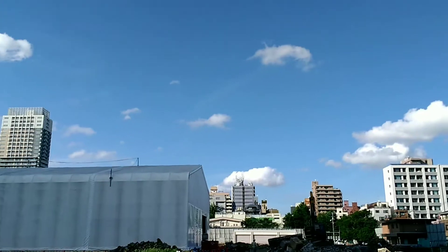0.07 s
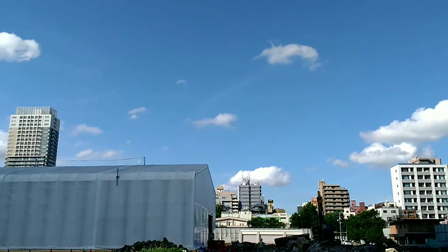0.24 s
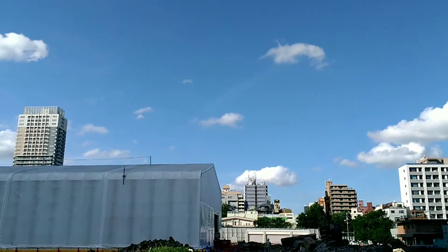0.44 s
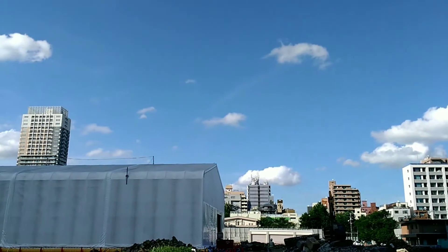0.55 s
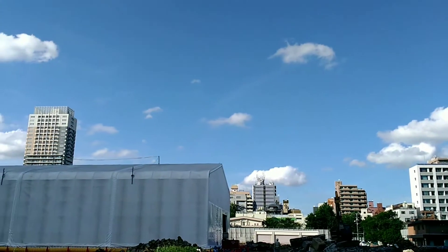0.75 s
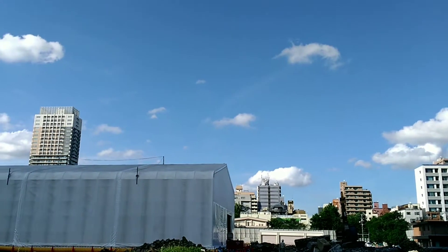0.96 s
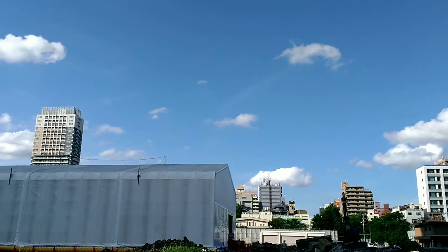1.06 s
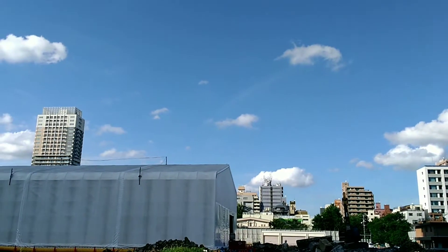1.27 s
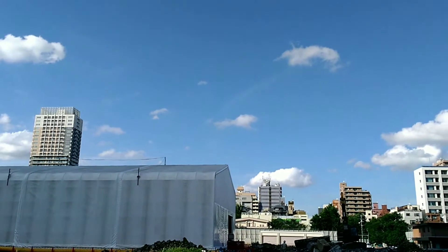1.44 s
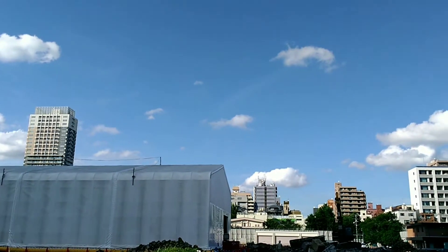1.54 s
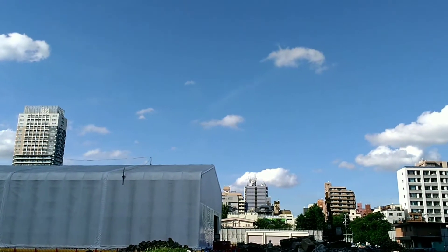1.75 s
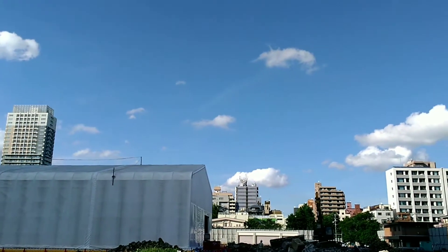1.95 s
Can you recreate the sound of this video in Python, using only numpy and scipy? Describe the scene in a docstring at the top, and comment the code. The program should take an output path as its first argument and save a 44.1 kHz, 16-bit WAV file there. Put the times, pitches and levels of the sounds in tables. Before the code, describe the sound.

Rubble crashes onto steel, slightly to the right, over a diesel engine and traffic roar. The ringing impacts echo between city buildings, then everything turns quieter and duller as pieces settle with light knocks.

```python
"""A city building site. From 0.2 s a diesel engine drones under traffic roar and a far machine's whine.
At 0.5 s rubble crashes on steel, off to the right: clustered impacts crack, set the steel ringing
and reverberate between the buildings. From 0.8 s the whole sound drops back and dulls.
Settling pieces then knock and clack under a faint chatter with blurred chirps."""
import sys
import numpy as np
from scipy import signal
from scipy.io import wavfile

SR = 44100
rng = np.random.default_rng(int(sys.argv[2]) if len(sys.argv) > 2 else 0)


def transcribe(signal):
    """Save signal, clipped to [-1, 1], as a 16-bit WAV file at the path in sys.argv[1]."""
    frames = np.atleast_2d(signal).T
    limited = np.clip(frames, -1, 1)
    pcm = np.round(limited * 32767).astype(np.int16)
    wavfile.write(sys.argv[1], SR, pcm)


N = 88200
T = np.arange(N) / SR

# Left-right likeness. Each row: frequency in Hz, correlation (clipped to 0-1 in use).
LIKENESS = [(300, 1), (600, 1.35), (1000, 0.77), (2000, 0), (5000, 0.12), (12000, -0.5)]
# Site direction. Each row: frequency in Hz, left minus right in dB.
BALANCE_DB = [(600, -0.5), (1400, -3.5), (2100, -3), (2900, -10.5), (3800, 1), (6500, 1.5), (13000, 16)]
# Gain of roar and hum, then of the drone. Each row: time in seconds, gain in dB.
BACKGROUND_GAIN_DB = [(.2, 0.5), (.5, 0.5), (.8, 2), (.9, -8.5), (1.0, -18), (1.2, -16), (1.45, -16.5),
                      (2.0, -15.5)]
DRONE_GAIN_DB = [(.2, 11), (.5, 5), (.9, -8), (1.08, -1), (1.19, -12), (1.26, -37), (1.54, -27),
                 (1.62, 5.5), (1.78, 0), (2.0, -9)]
# Engine tones. Each row: pitch in Hz, rms level in dB before those gains.
DRONE_TONES = [(59.3, -52.5), (91.8, -53)]
HUM_TONES = [(126, -43.5), (178, -47.5), (266, -47), (501, -76), (531, -49.5), (969, -53)]
# Whine and chatter levels. Each row: time in seconds, rms level in dB.
WHINE_DB = [(.2, -45), (.45, -43), (.75, -44.5), (.91, -64), (.98, -52.5), (1.06, -69), (1.3, -67),
            (1.36, -52.5), (1.47, -53), (1.67, -71), (1.75, -51.5), (1.84, -65)]
CHATTER_DB = [(.2, -43), (.8, -40.5), (.95, -68.5), (1.25, -55.5), (1.6, -55.5), (1.78, -59), (2.0, -57.5)]
# Noise spectra. Each row: frequency in Hz, relative density in dB.
ROAR_SPECTRUM = [(30, -15), (60, -56), (120, -2.5), (200, 2.5), (350, -3.5), (550, -3.5), (1000, -10.5),
                 (1500, -11.5), (2900, -18.5), (3800, -26), (6500, -34.5), (14000, -55)]
CHATTER_SPECTRUM = [(1200, -10), (2000, -4.5), (2700, 8), (3300, 0), (4200, -27.5), (7000, -38.5)]
HISS_SPECTRUM = [(100, 4), (4000, 11), (8000, 3), (14000, -5)]
RUMBLE_SPECTRUM = [(120, -3.5), (180, -5), (300, 0), (450, -30)]
CLACK_SPECTRUM = [(300, -16), (600, -1), (950, -2.5), (1400, -10.5)]
CRACK_SPECTRUM = [(1500, 2), (3500, 6.5), (7500, -7.5), (11000, -47)]
CRASH_SPECTRUM = [(60, -6), (120, -5), (200, -5.5), (350, -3), (550, 3.5), (1000, -2), (1500, -2.5),
                  (2200, -7), (2900, -1.5), (3600, -16.5), (4500, -21.5), (6500, -84)]
# Faint chirps. Each row: centre in seconds, level in dB, pitch in Hz, length in seconds.
CHIRPS = [(.27, -39.5, 2664, 0.043), (1.25, -58.5, 2670, 0.13), (1.355, -54.5, 2775, 0.04),
          (1.55, -55, 3070, 0.062), (1.625, -51, 2598, 0.016), (1.88, -55.5, 3064, .06)]
# Heavy pieces booming in the crash, then settling pieces; then loose steel. Each row: start in seconds, level
# in dB, pitch in Hz, T60 in seconds.
KNOCKS = [(0.526, -20.5, 175, 0.18), (.545, -27, 257.3, .25), (.588, -34.5, 116, 0.18),
          (0.609, -22, 198, 0.13), (0.681, -26, 250.4, 0.195), (.718, -30, 119.6, 0.15),
          (0.755, -31, 228, 0.091), (0.836, -24.5, 124, 0.062), (0.914, -35.5, 470, 0.13),
          (0.945, -36.5, 98, 0.045), (1.113, -38.5, 253, .13), (1.166, -41, 434, 0.11),
          (1.242, -37, 117, 0.22), (1.334, -36.5, 190, 0.15), (1.43, -33.5, 259, 0.53),
          (1.441, -37, 123.6, 0.21), (1.475, -38.5, 323.5, 0.25), (1.532, -30.5, 251, 0.089),
          (1.553, -34, 176, .2), (1.666, -36, 248, 0.17), (1.753, -35.5, 365.4, 0.19),
          (1.784, -33, 110.7, 0.14), (1.884, -40.5, 267.6, 0.25), (1.972, -34.5, 266, 0.38)]
CLANGS = [(.524, -24, 757, .14), (.529, -25, 654.4, 0.22), (.541, -28, 993, 0.47), (.538, -27, 2960, 0.07),
          (.562, -26, 860, 0.19), (.563, -24, 502.6, 0.25), (.628, -31, 902, 0.19), (.7, -27, 2900, 0.08),
          (.797, -33.5, 430.6, 0.29)]
# Light pieces, then brittle first hits. Each row: start in seconds, level in dB.
CLACKS = [(0.988, -53), (1.155, -53), (1.335, -46), (1.44, -38.5), (1.752, -47.5), (1.855, -48.5)]
CRACKS = [(0.404, -46), (0.537, -31.5)]
# Heavy pieces landing. Each row: start in seconds, relative level in dB.
BLOWS = [(0.536, 2), (0.55, -4.5), (.562, -2.5), (0.573, 1), (.599, -3), (0.62, -7), (0.701, -18),
         (0.736, -20), (.78, -13), (0.852, -10.5)]
# Steel modes. Each row: pitch in Hz, relative level in dB, T60 in seconds.
STEEL_MODES = [(191, -6, .3), (421, -2, .4), (659, -8, .4), (987, -8, .45), (1276, -6, .6), (1446, -7, .4),
               (2970, -5, .25), (3606, -12, .4), (3965, -14, .5)]
# Ring of heap and yard. Each row: frequency in Hz, T60 in seconds.
YARD_T60_S = [(100, 0.18), (500, 0.68), (1500, 0.67), (3000, 0.63), (6000, 0.13)]

CHATTER_PAN_DB = -7


def from_db(db):
    """Decibels to gain."""
    return 10 ** (np.asarray(db) / 20)


def unit_rms(x):
    """Scale to rms 1."""
    return x / np.sqrt(np.mean(x ** 2) + 1e-20)


def gain_curve(rows):
    """Gain per sample from (s, dB) rows."""
    return from_db(np.interp(T, *np.transpose(rows)))


def at_hz(rows, hz):
    """Table lookup on a log-frequency axis."""
    freqs_hz, values = np.transpose(rows)
    return np.interp(np.log(hz), np.log(freqs_hz), values)


def drift(rate_hz):
    """Smooth random curve, rms 1."""
    step, warmup = 40, 2000
    pole = np.exp(-2 * np.pi * step * rate_hz / SR)
    white = rng.standard_normal(N // step + warmup + 2)
    slow = signal.lfilter([1], [1, -2 * pole, pole * pole], white)[warmup:]
    return np.interp(np.arange(N) / step, np.arange(len(slow)), unit_rms(slow))


def pan(db):
    """Stereo gains of unit mean power; positive is left."""
    return unit_rms(from_db(np.array([[db], [-db]]) / 2))


def site_pan(hz):
    """Stereo gains of the site at one frequency."""
    return pan(at_hz(BALANCE_DB, hz))


def butter(x, hz, kind, order=4):
    """Butterworth filter."""
    return signal.sosfilt(signal.butter(order, hz, kind, fs=SR, output="sos"), x)


def bands(spectrum):
    """Yield (Hz, stereo noise) per third octave."""
    edges_hz = 28 * 2 ** (np.arange(28) / 3)
    white = rng.standard_normal((2, 2, N))
    for k, (low, high) in enumerate(zip(edges_hz, edges_hz[1:])):
        hz = np.sqrt(low * high)
        if spectrum[0][0] / 2 < hz < spectrum[-1][0] * 2:
            mid, side = butter(white[k % 2], [low, high], "band", order=2)
            alike = np.clip(at_hz(LIKENESS, hz), 0, 1)
            stereo = np.sqrt(1 + alike) * mid + np.sqrt(1 - alike) * side * [[1], [-1]]
            yield hz, from_db(at_hz(spectrum, hz)) * stereo


def decay(start_s, t60_s):
    """Step to 1, then exponential fall."""
    return (T >= start_s) * from_db(-60 * np.maximum(T - start_s, 0) / t60_s)


def strike(start_s, attack_s, fall_db_per_s):
    """Linear rise, then exponential fall."""
    rise = np.clip((T - start_s) / attack_s, 0, 1)
    return rise * from_db(-fall_db_per_s * np.maximum(T - start_s - attack_s, 0))


def swell(centre_s, length_s):
    """Gaussian envelope."""
    return np.exp(-2 * ((T - centre_s) / length_s) ** 2)


def tones(rows, flutter_db=1, wander_hz=1.165):
    """Machine tones, unsteady in level and pitch."""
    out = 0
    for hz, db in rows:
        gain = np.sqrt(2) * from_db(db + flutter_db * drift(17))
        cycles = rng.random() + np.cumsum(hz + wander_hz * drift(3.97)) / SR
        out = out + gain * np.sin(2 * np.pi * cycles)
    return out


def engine_and_traffic(roar_db=-35, flutter_db=1.17):
    """Broad roar with the diesel's hum and deep drone."""
    roar = sum(band * site_pan(hz) * from_db(flutter_db * drift(5.5))
               for hz, band in bands(ROAR_SPECTRUM))
    bed = from_db(roar_db) * unit_rms(roar) + tones(HUM_TONES)
    return gain_curve(BACKGROUND_GAIN_DB) * bed + gain_curve(DRONE_GAIN_DB) * tones(DRONE_TONES)


def whine(hz=669.7):
    """A far machine tone comes and goes on the air."""
    return gain_curve(WHINE_DB) * tones([(hz, 0)])


def chatter(grain_db=2.5, hiss_db=-71):
    """Flickering noise near 3 kHz on the right, over faint hiss."""
    flicker = unit_rms(sum(band * from_db(grain_db * drift(33)) for _, band in bands(CHATTER_SPECTRUM)))
    hiss = unit_rms(sum(band for _, band in bands(HISS_SPECTRUM)))
    return gain_curve(CHATTER_DB) * flicker * pan(CHATTER_PAN_DB) + from_db(hiss_db) * hiss


def chirps(rise_hz_per_s=300, warble_hz=192.6, roughness=.48):
    """Rough rising chirps, perhaps far birds, blurred differently in each ear."""
    out = 0
    for centre_s, db, hz, length_s in CHIRPS:
        pitch_hz = hz + rise_hz_per_s * (T - centre_s) + warble_hz * np.array([drift(154), drift(148.9)])
        voice = np.sin(2 * np.pi * np.cumsum(pitch_hz, axis=1) / SR) * (1 + roughness * drift(300))
        out = out + from_db(db) * unit_rms(voice) * swell(centre_s, length_s)
    return out * pan(CHATTER_PAN_DB)


def whistle(hz=3770, waver_hz=35, db=-58):
    """One brief wavering note among the chirps."""
    note = np.sin(2 * np.pi * np.cumsum(hz + waver_hz * drift(99)) / SR)
    return from_db(db) * note * swell(centre_s=1.24, length_s=.04) * pan(CHATTER_PAN_DB)


def rustle(band_hz=(3800, 5100), db=-67):
    """Soft high noise swells behind the chirps."""
    noise = butter(rng.standard_normal((2, N)), band_hz, "band")
    return from_db(db) * unit_rms(noise) * swell(centre_s=1.24, length_s=.25)


def knocks(attack_s=.0052, rumble_db=-10.5, clack_t60_s=.19, top_hz=1190):
    """Heavy pieces boom in the crash and settling pieces after it, each at one pitch with a short rumble;
    lighter ones clack."""
    rumble = unit_rms(sum(band for hz, band in bands(RUMBLE_SPECTRUM) if hz > 80))
    clack = unit_rms(sum(band for _, band in bands(CLACK_SPECTRUM)))
    out = clack * sum(from_db(db) * strike(start_s, attack_s, 60 / clack_t60_s) for start_s, db in CLACKS)
    for start_s, db, hz, t60_s in KNOCKS:
        boom = np.sin(2 * np.pi * hz * (T - start_s)) + from_db(rumble_db) * rumble
        rise = np.clip((T - start_s) / attack_s, 0, 1)
        out = out + from_db(db) * boom * rise * decay(start_s, t60_s)
    return butter(out, top_hz, "low") * pan(db=1.5)


def cracks(grain_db=.5):
    """Gritty treble bursts as a stray piece hits, then the load."""
    noise = sum(band * site_pan(hz) for hz, band in bands(CRACK_SPECTRUM))
    grit = unit_rms(noise * from_db(grain_db * drift(200)))
    return grit * sum(from_db(db) * strike(start_s, attack_s=.0011, fall_db_per_s=185)
                      for start_s, db in CRACKS)


def clangs(attack_s=.0087, shimmer=.36):
    """Loose steel pieces ring at their own pitches, shaken by the rubble."""
    out = 0
    for start_s, db, hz, t60_s in CLANGS:
        phase = 2 * np.pi * hz * (T - start_s) + shimmer * drift(37)
        note = np.sin(phase) * (1 + shimmer * drift(47))
        out = out + from_db(db) * note * strike(start_s, attack_s, 60 / t60_s)
    return out * pan(db=1)


def contacts(pieces_per_s=1800, pour_db=-14.5, cluster_t60_s=.0047):
    """Small pieces pour; heavy ones land in tight clusters of contacts."""
    pour = (rng.random(N) < pieces_per_s / SR) * rng.standard_normal(N)
    out = from_db(pour_db) * pour * strike(start_s=.508, attack_s=.036, fall_db_per_s=38)
    for start_s, db in BLOWS:
        cluster = rng.standard_normal(N) ** 3 * decay(start_s, cluster_t60_s)
        out = out + from_db(db) * cluster / np.linalg.norm(cluster)
    return out


def steel_ring(hits):
    """Contacts drive two-pole steel modes; high modes differ more between the ears."""
    out = 0
    for hz, db, t60_s in STEEL_MODES:
        alike = np.clip(at_hz(LIKENESS, hz), 0, 1)
        drive = hits * (np.sqrt(alike) + np.sqrt(1 - alike) * rng.standard_normal((2, N)))
        pole, angle = from_db(-60 / (t60_s * SR)), 2 * np.pi * hz / SR
        mode = signal.lfilter([0, np.sin(angle)], [1, -2 * pole * np.cos(angle), pole ** 2], drive + 1e-18)
        out = out + from_db(db) * unit_rms(mode) * site_pan(hz)
    return unit_rms(out)


def crash(direct_db=15.5, direct_s=.0046, heap_db=-36, steel_db=-42, fade_s=.76, fade_db_per_s=47):
    """Contacts sound through heap and yard and ring the steel; the fall steepens at fade_s."""
    hits, heap = contacts(), 0
    direct = from_db(direct_db) * np.exp(-T / direct_s)
    for hz, band in bands(CRASH_SPECTRUM):
        response = band * (direct + decay(0, at_hz(YARD_T60_S, hz)))
        heard = signal.fftconvolve(hits[None], response[:, :N // 2], axes=1)[:, :N]
        heap = heap + band.std() * unit_rms(heard) * site_pan(hz)
    body = from_db(heap_db) * unit_rms(heap) + from_db(steel_db) * steel_ring(hits)
    return body * from_db(-fade_db_per_s * np.maximum(T - fade_s, 0))


def dulled(x, above_hz=3600, start_s=.81, fall_db_per_s=140, depth_db=18):
    """The treble drops after the crash."""
    lows = signal.sosfiltfilt(signal.butter(10, above_hz, fs=SR, output="sos"), x)
    cut_db = np.clip(fall_db_per_s * (T - start_s), 0, depth_db)
    return lows + (x - lows) * from_db(-cut_db)


def scene(left_lag_s=.00026):
    """Stereo mix. The site lies to the right, so the left ear lags."""
    site = dulled(engine_and_traffic() + crash())
    distant = whine() + chatter() + chirps() + whistle() + rustle()
    left, right = site + distant + cracks() + clangs() + knocks()
    late_left = np.interp(T - np.round(left_lag_s * SR) / SR, T, left)
    return np.array([late_left, right])


def record(dry):
    """The sound cuts in, with deep bass and extreme treble removed."""
    start_s, low_cut_hz, top_hz = .193, 45.3, 14000
    gated = butter(dry, low_cut_hz, "high") * (T >= start_s)
    return signal.sosfilt(signal.ellip(10, .1, 80, top_hz, fs=SR, output="sos"), gated)


dry = scene()
out = record(dry)
transcribe(out)
```